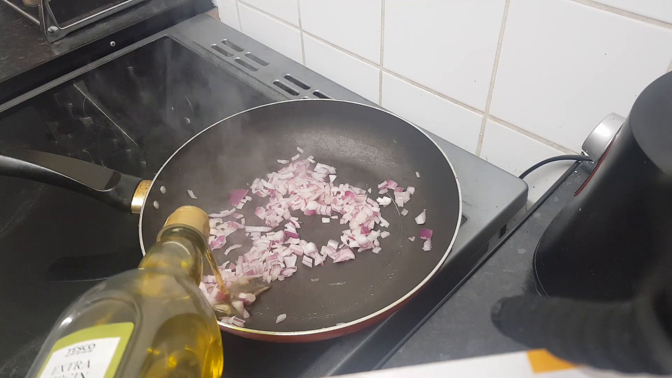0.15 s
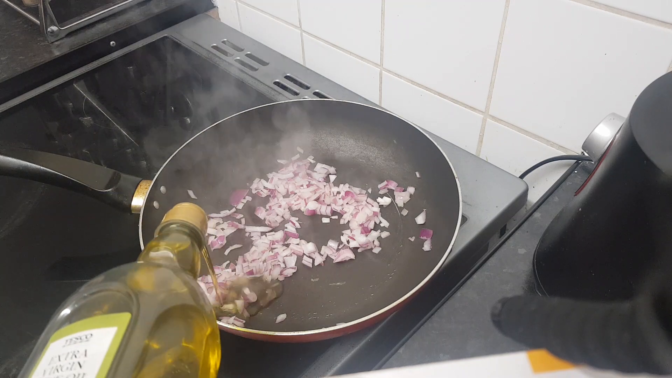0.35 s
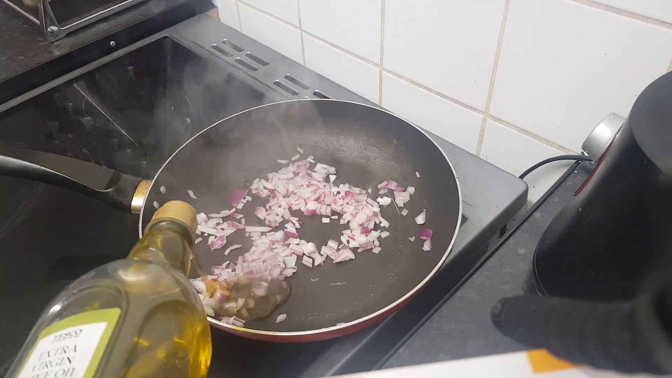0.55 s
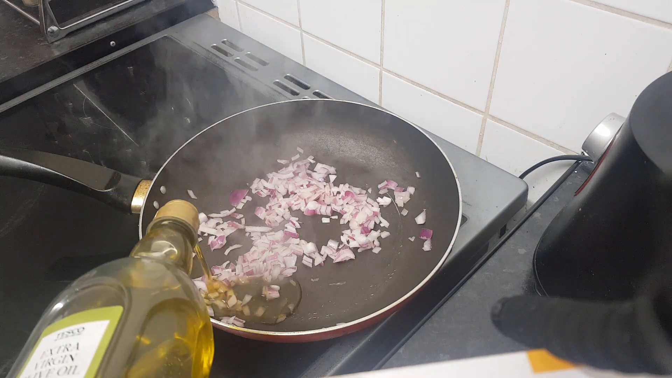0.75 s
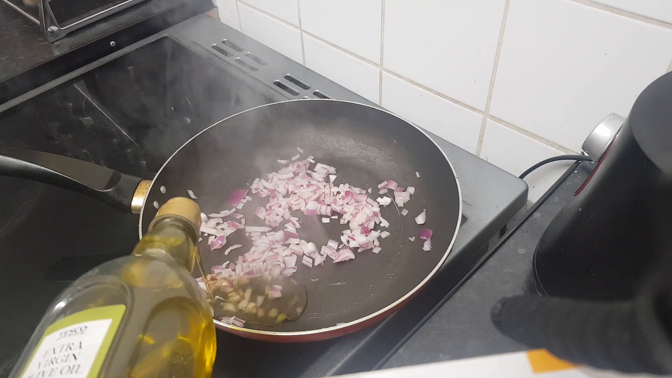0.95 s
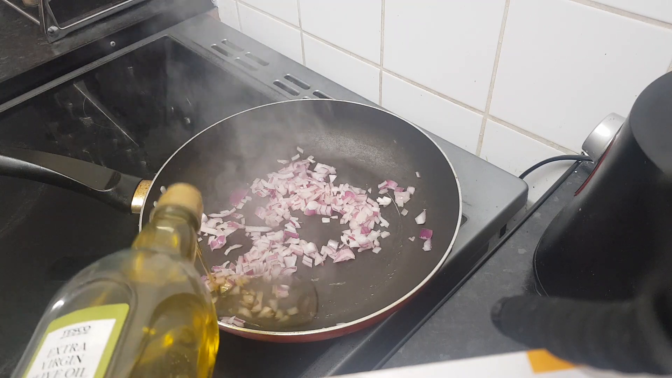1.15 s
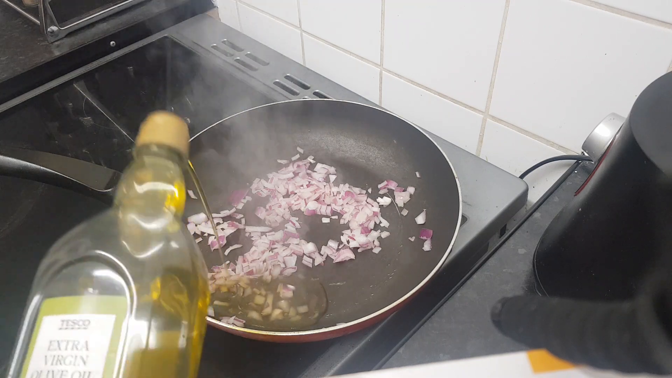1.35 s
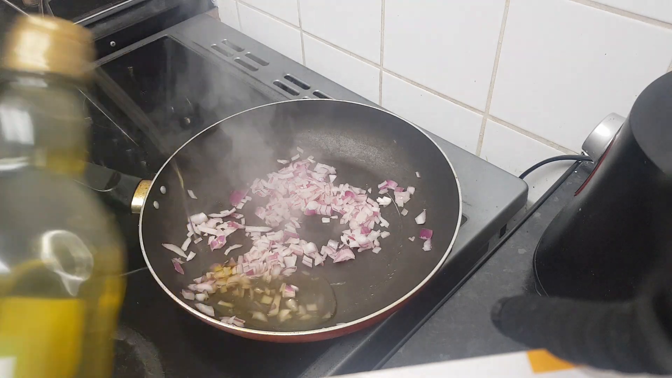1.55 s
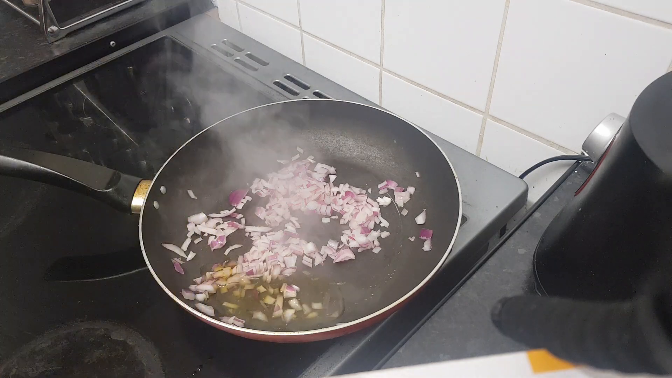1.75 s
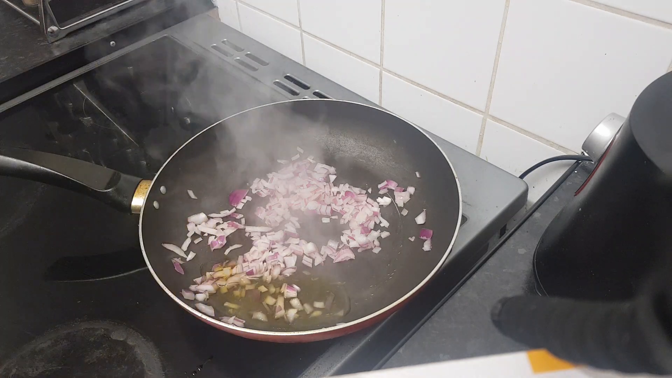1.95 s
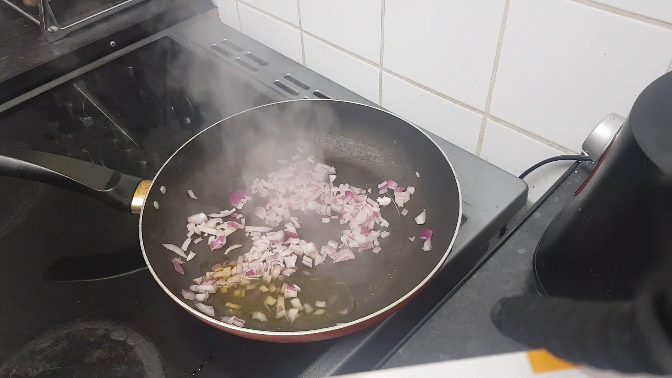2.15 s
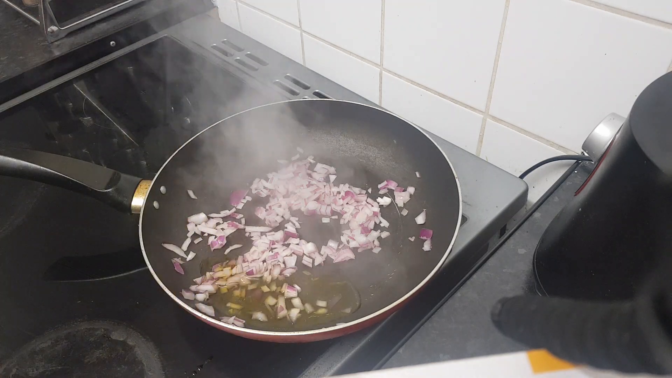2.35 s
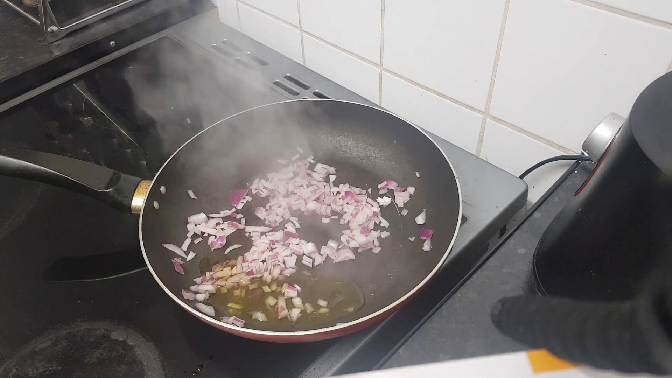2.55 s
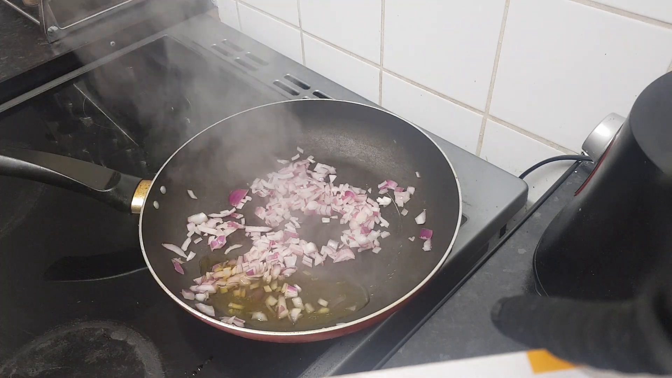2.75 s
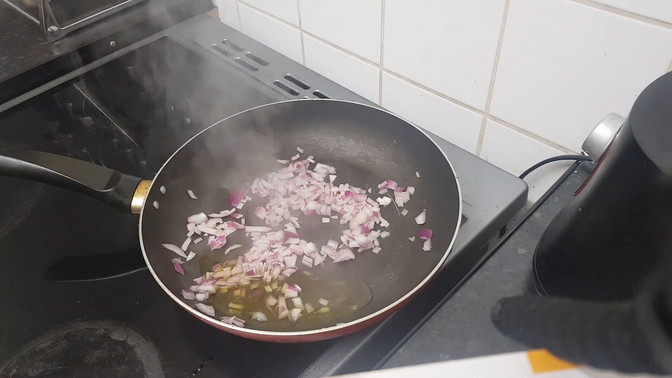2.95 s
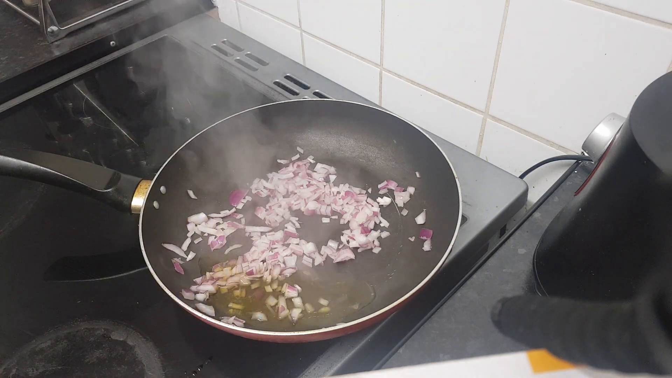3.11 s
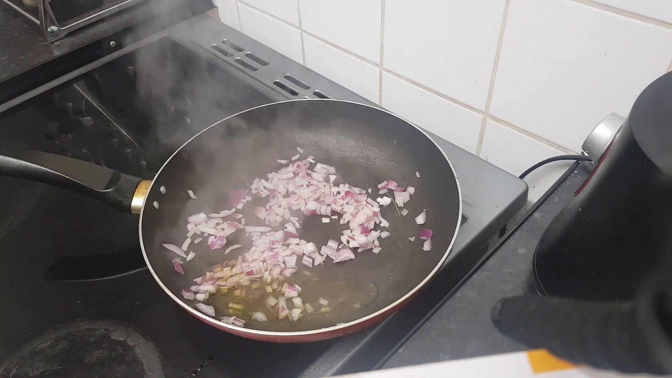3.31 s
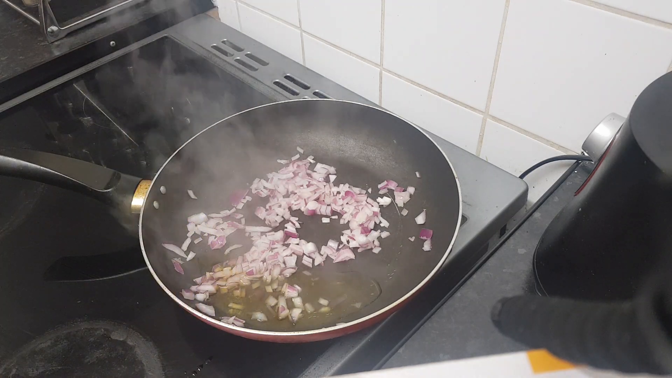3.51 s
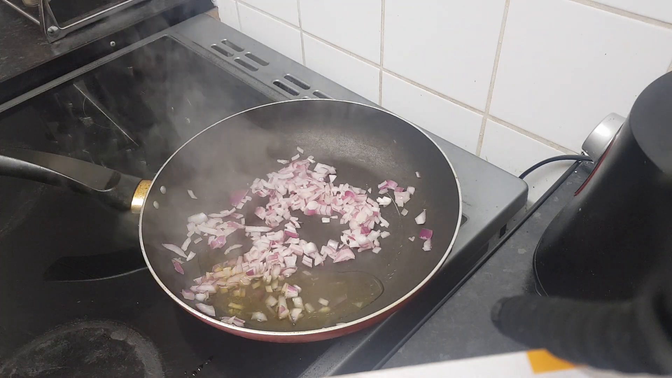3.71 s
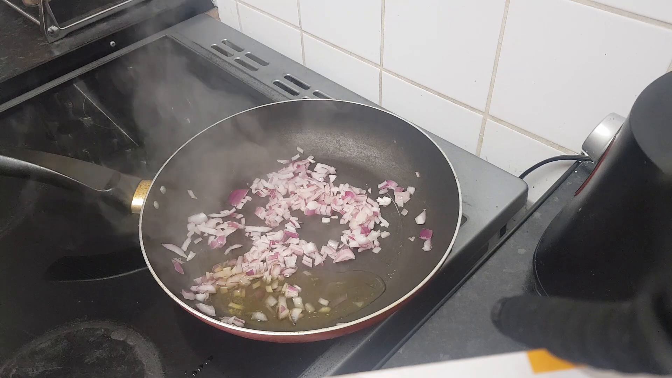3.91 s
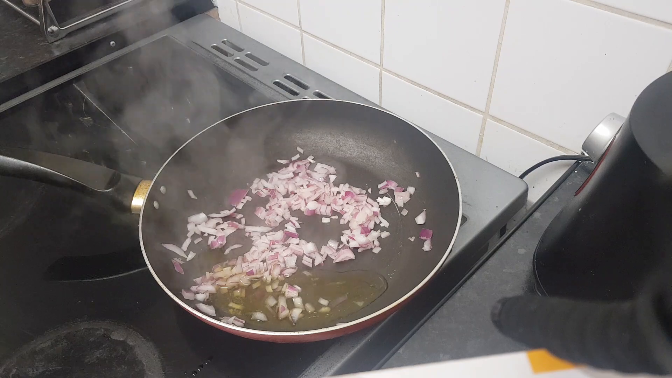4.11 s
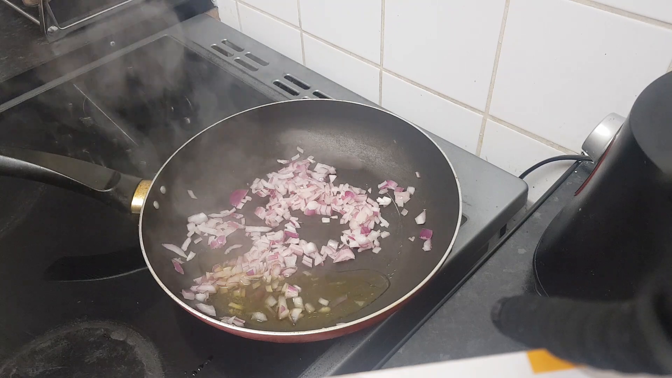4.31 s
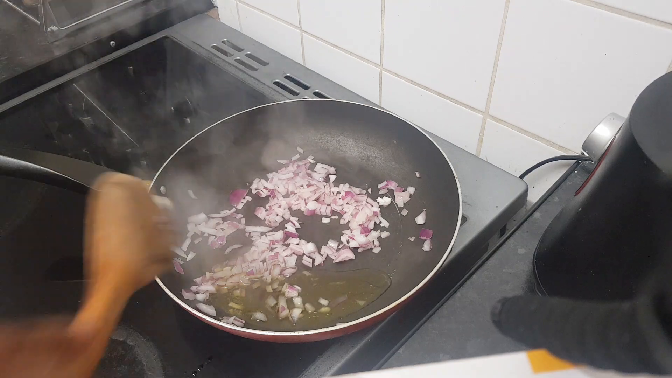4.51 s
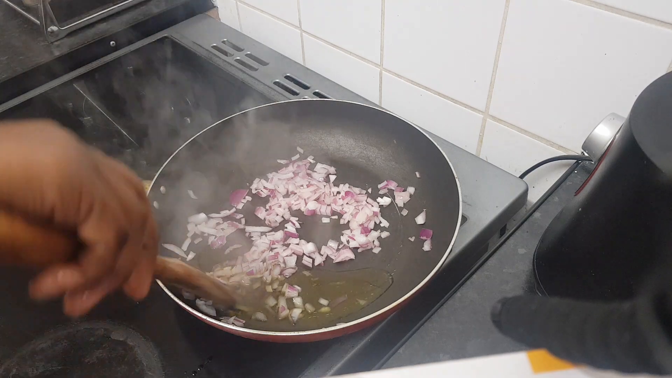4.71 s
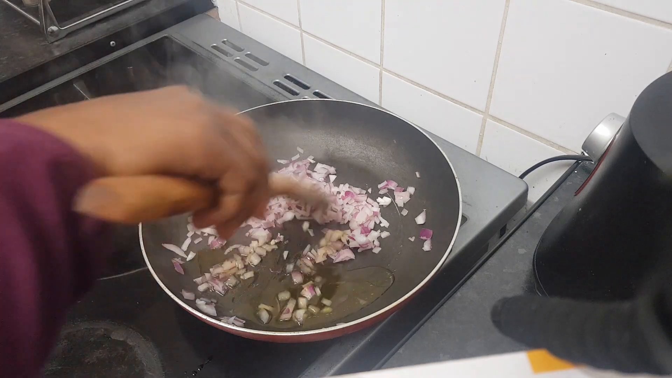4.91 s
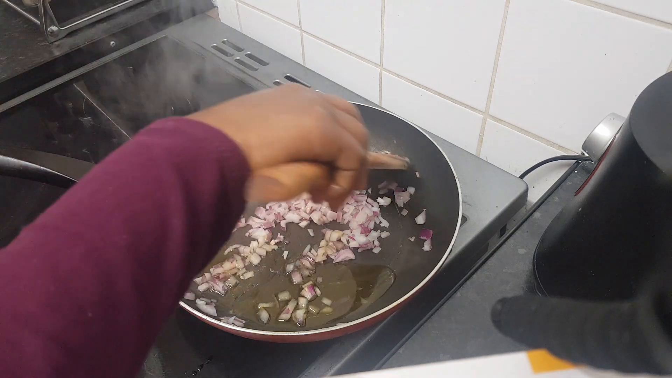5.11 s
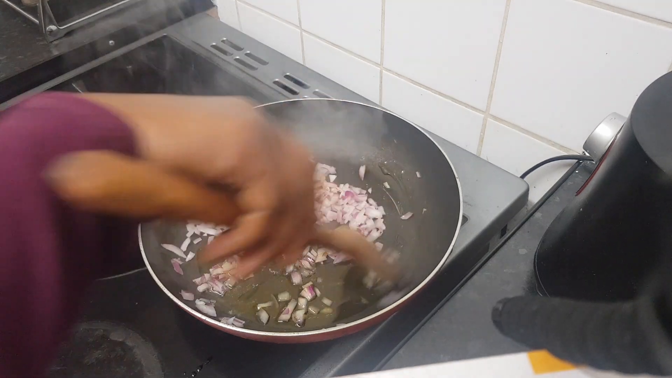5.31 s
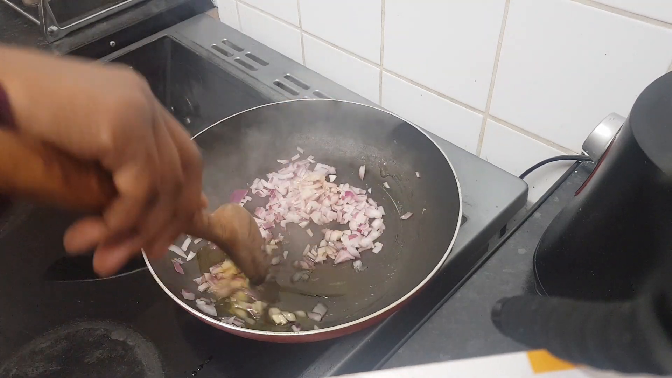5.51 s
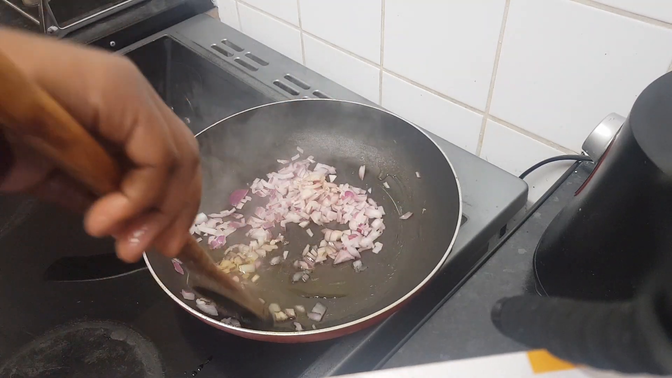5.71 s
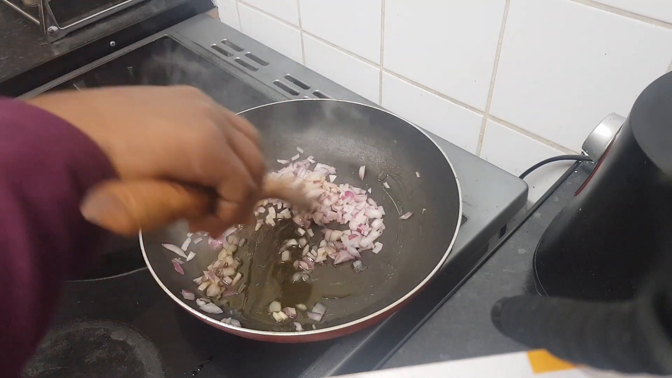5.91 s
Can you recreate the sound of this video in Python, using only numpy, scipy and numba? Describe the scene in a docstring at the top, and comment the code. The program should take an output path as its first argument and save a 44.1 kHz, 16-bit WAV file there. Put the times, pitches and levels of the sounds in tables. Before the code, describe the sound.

Chopped onions sizzle steadily in hot oil; a bottle bumps down, a cupboard door bangs loudly, then a wooden spoon knocks and scrapes the pan.

```python
"""In a tiled kitchen, chopped onions sizzle in oil in a frying pan, heard from a phone held above the hob.
The sizzle is dense random steam clicks through resonances; single drops spit as short snaps with a fizz.
An oil bottle is set down with a few bumps and a cupboard door bangs shut, both as ringing modes of struck bodies;
the bang ducks the phone's gain for a second or so. Then a wooden spoon knocks and scrapes round the pan and the
sizzle swells. A fan, made of narrow bands of noise, hums low throughout."""
import sys
import numpy as np
from scipy import signal
from scipy.fft import rfft, irfft
from scipy.io import wavfile
from scipy.ndimage import uniform_filter1d
from numba import njit

SR = 44100
rng = np.random.default_rng(int(sys.argv[2]) if len(sys.argv) > 2 else 0)


def materialize(psi):
    """Save the field psi as 16-bit PCM at rate SR to the path in sys.argv[1].

    A 1-D psi becomes a single channel; in a 2-D psi each row is a channel.
    """
    bounded = np.clip(np.atleast_2d(psi).T, -1, 1)
    quanta = np.round(bounded * 32767).astype(np.int16)
    wavfile.write(sys.argv[1], SR, quanta)


N = 267246
T = np.arange(N) / SR  # the clock, in seconds

# The fan's hum. Each row: centre in Hz, nominal width in Hz, level in dB.
FAN_BANDS = [(39.8, 12, -65.5), (89.2, 5.1, -65.5), (98, 16, -68), (128, 69, -70.5), (162.4, 8.6, -75),
             (183.8, 22, -74)]

# The bottle set down on the worktop. Each row: time in seconds, peak in dB before the room,
# contact corner in Hz (soft is low).
BOTTLE_BLOWS = [(1.535, -45.5, 900), (1.831, -45.5, 160), (1.983, -35.5, 1100), (2.022, -36.5, 900),
                (2.06, -41.5, 260), (2.164, -33, 547), (2.189, -32, 1120)]
# Modes of bottle and worktop. Each row: pitch in Hz, relative level in dB, t60 in seconds.
BOTTLE_MODES = [(80, -7.5, 0.12), (165, -3.5, 0.12), (206, -11, 0.075), (341.5, -4.5, 0.065),
                (428, -1.5, 0.084), (471, -9, 0.19), (502, -7, 0.43), (579, -6, 0.19), (703, -9, 0.1),
                (826, -7, 0.095), (1067, -5, 0.11)]

# Blows on the cupboard, from the first nudge through the bang to things settling inside.
# Each row: time in seconds, peak in dB before bass loss and room, contact corner in Hz.
CUPBOARD_BLOWS = [(3.223, -36, 400), (3.234, -24.5, 70.3), (3.256, -26.5, 350), (3.264, -23.5, 80),
                  (3.3366, -1.3, 600), (3.3495, -15, 550), (3.573, -35, 150), (3.7, -36.5, 120),
                  (3.835, -32, 1404), (4.069, -40.5, 600)]
# Modes of cupboard door and carcass. Each row: pitch in Hz, relative level in dB, t60 in seconds.
CUPBOARD_MODES = [(77, -25, .55), (101, -19, .3), (138, -18, .15), (194, -2, .18), (234, -3, .15),
                  (309, 2.5, .14), (318, -39, 1.6), (364, -4, .18), (397, -2, .2), (439, -3, .24),
                  (488, -3, .22), (520, -7, .25), (554, -5, .2), (608, 0, .18), (699, -11, .25),
                  (746, -14, .2), (890, -14, .22), (1040, -16, .2)]
# Colour of the door's chatter. Each row: frequency in Hz, gain in dB.
CHATTER_COLOUR = [(150, -16), (240, 4), (460, 14), (660, 13), (850, 3.5), (1500, 1), (2800, -2.5),
                  (4200, -7), (5200, -15), (7000, -33), (16000, -45)]
# The door chatters in its frame as it shuts, each bounce sooner and weaker.
SHUT_S, SHUT_DB = 3.3362, -10.5  # first contact; its noise level before decay and colour
CHATTER_GAP_S, CHATTER_FALL_DB = .012, 3.5  # first gap; loss per bounce
GAP_SHRINK = .72  # each gap as a share of the one before

# Knocks of the spoon, each of which rocks the pan on the hob. Each row: time in seconds,
# peak in dB before the room, contact corner in Hz, time to rock back in seconds, peak of that rock in dB.
PAN_BLOWS = [(4.79, -37.5, 90, .066, -50.5), (5.165, -20, 900, .1, -34), (5.739, -28, 700, .07, -35)]
# Modes of the pan on the hob. Each row: pitch in Hz, relative level in dB, t60 in seconds.
PAN_MODES = [(91.5, 0.5, 0.11), (149, -1, 0.098), (175.2, -0.5, 0.28), (186.6, 2.5, 0.22), (241, -8, 0.18),
             (320, -2.5, 0.21), (384, -6, 0.23), (442, -2, 0.13), (535, 5.5, 0.08), (597, 2, 0.22),
             (723, 3.5, 0.077), (813, 8, 0.15), (957, -17, .16), (1220, -6, 0.087), (1314, -17, .1)]
ROCK_HZ, ROCK_FALL_DB = 211, 7.5  # contact corner of the rocking; loss from one rock to the next
# Strokes of the spoon over the pan. Each row: start in seconds, end in seconds,
# level in dB before pressure and room, centre in Hz.
STROKES = [(4.655, 4.772, -54, 544), (4.77, 4.922, -55.5, 720), (4.773, 4.948, -55.5, 139),
           (5.147, 5.434, -56, 216), (5.19, 5.42, -67, 650), (5.424, 5.556, -55.5, 583),
           (5.742, 5.893, -55, 198), (5.79, 5.917, -53, 700), (5.85, 5.93, -45, 1870)]

# Colour of the frying. Each row: frequency in Hz, gain in dB.
FRY_COLOUR = [(150, -16.5), (330, -17.5), (520, -8), (750, -5.5), (1100, -4), (2200, -4), (4000, -1.5),
              (6500, 0), (10000, -0.5), (16000, -4)]
# The loudest drops of water that spit in the oil. Each row: time in seconds,
# snap peak in dB before trim, colour and room, pitch in Hz.
LOUD_SPITS = [(.925, -24, 4500), (1.462, -24, 6940), (1.525, -24, 11400), (1.902, -24, 2200),
              (2.511, -25, 5550), (2.609, -18.5, 6250), (3.466, -22, 6700), (3.644, -20.5, 6450),
              (5.253, -23, 4170), (5.496, -20, 6840)]
# Smaller drops spit at random, around this level and pitch.
SPITS_PER_S, SMALL_SPIT_DB, SMALL_SPIT_HZ = 3, -31, 5500
# How hard the onions fry: nominal level at rest, and how it builds from below as fresh oil runs in.
FRY_DB, OIL_LACK_DB, OIL_SPREAD_S = -43, 3, 0.15
# Each sweep of the spoon turns wet onion onto hot metal.
# Each row: time in seconds, nominal surge in dB (before its rise and fade, and scaled in each band).
SWEEPS = [(4.5, 0.7), (4.86, 2), (5.4, 1), (5.82, 2)]
SURGE_RISE_S, SURGE_FADE_S = 0.031, 1.74  # time constants

# Decay of the kitchen. Each row: frequency in Hz, t60 in seconds.
KITCHEN_DECAY = [(100, 0.31), (500, 0.31), (4000, 0.26), (16000, 0.042)]
# Resonances of the two microphone ports. Each row: frequency in Hz, left gain in dB, right gain in dB.
PORT_GAINS = [(286, 2.5, 3.5), (737, 3.1, 1.5), (2860, 4.5, 3.5), (5400, 4, 3), (6900, 7.5, 3),
              (7720, -4, 5.5), (8480, 0.5, -6.5), (9830, -3.5, 3.5), (9930, 5, -2.5), (11600, 1.5, 4.5),
              (13840, 2, 2.5), (15800, -18, 6)]
TOP_HZ = 15800  # top edge of the phone's sound


def undb(db):
    """Turn dB into an amplitude factor."""
    return 10 ** (np.asarray(db) / 20)


def unit(x):
    """Scale to rms 1."""
    return x / np.sqrt(np.mean(x ** 2))


def on_log_axis(hz, points):
    """Read (Hz, value) points at any frequency."""
    f, value = np.transpose(points)
    return np.interp(np.log(np.maximum(hz, 1)), np.log(f), value)


def colour(x, points, size=2048):
    """Causal, minimum-phase filter with the given (Hz, dB) response."""
    response = undb(on_log_axis(np.fft.rfftfreq(size, 1 / SR), points))
    cepstrum = irfft(np.log(response))
    # folding the cepstrum forward in time makes the filter causal
    cepstrum[1:size // 2] *= 2
    cepstrum[size // 2 + 1:] = 0
    impulse = irfft(np.exp(rfft(cepstrum)))
    return signal.fftconvolve(x, impulse[None], axes=-1)[:, :x.shape[-1]]


def resonate(x, hz, q):
    """One resonance, gain 1 at its centre."""
    w = 2 * np.pi * min(hz, SR / 2 - 2000) / SR
    a = np.sin(w) / (2 * q)
    return signal.lfilter([a, 0, -a], [1 + a, -2 * np.cos(w), 1 - a], x)


def add(track, s, sound):
    """Mix a short sound into a track at time s."""
    i = int(s * SR)
    track[..., i:i + sound.shape[-1]] += sound[..., :N - i]


def pair(x, lag):
    """A source to one side reaches the left port some samples late (early if negative)."""
    n = np.arange(N)
    return np.array([np.interp(n - lag, n, x), x])


def clicks(rate, spread_db, lag=0, scatter=0):
    """Random clicks per second, many small and few large; scatter gives each its own place."""
    count = int(rate * N / SR)
    at = rng.integers(0, N, count)
    size = undb(spread_db * np.minimum(rng.exponential(size=count), 7.5))
    size = size * rng.choice([-1, 1], count)
    late = np.rint(lag + scatter * rng.standard_normal(count)).astype(int)
    left = np.bincount((at + late) % N, size, N)
    right = np.bincount(at, size, N)
    return np.array([left, right])


def diffuse(x, t60):
    """Echoes of countless scattered sources merge into a hiss that trails their power, unrelated at the ports."""
    keep = np.exp(-2 * np.log(1000) / (t60 * SR))
    power = signal.lfilter([1 - keep], [1, -keep], x ** 2)
    return np.sqrt(power) * rng.standard_normal((2, N))


def kitchen(x, wet_db, first_s=0.0011, alike_hz=520):
    """Direct sound plus dense reflections off the tiles; only the bass is alike at both ports."""
    t = np.arange(SR // 2) / SR
    f = np.fft.rfftfreq(len(t), 1 / SR)
    mid, side = rfft(rng.standard_normal((2, len(t))))
    alike = 1 / (1 + (f / alike_hz) ** 2)
    sides = np.array([[1], [-1]])
    field = mid * np.sqrt((1 + alike) / 2) + sides * side * np.sqrt((1 - alike) / 2)
    centres = np.array(KITCHEN_DECAY)[:, 0]
    echo = 0
    for (hz, t60), share in zip(KITCHEN_DECAY, np.eye(len(KITCHEN_DECAY))):
        band = on_log_axis(f, np.c_[centres, share])  # bands cross-fade and sum to 1
        echo = echo + irfft(field * band, len(t)) * np.exp(-np.log(1000) * t / t60)
    echo = unit(echo * (t > first_s)) / np.sqrt(len(t))  # unit energy
    return x + undb(wet_db) * signal.fftconvolve(x[1:], echo, axes=-1)[:, :N]


def struck(blows, modes, lag, vary_db, apart_hz=520):
    """Each blow rings the modes of a body in its own mix; a soft contact leaves out the high ones."""
    out, t = np.zeros((2, N)), np.arange(SR) / SR
    hz, db, t60 = np.transpose(modes)[:, :, None]
    # the shorter its wave, the more a mode differs in phase between the ports once the near walls answer
    twist = rng.choice([-1, 1], hz.shape) * np.minimum(hz / apart_hz, 1) / 2
    twist = twist * (1 - np.exp(-t / 0.0057))
    decay = undb(db) * np.exp(-np.log(1000) * t / t60)
    rings = np.array([decay * np.cos(2 * np.pi * hz * t + side * twist) for side in (1, -1)])
    for s, peak_db, corner_hz in blows:
        mix = undb(vary_db * rng.standard_normal(len(modes)))
        soften = signal.butter(2, corner_hz, fs=SR, output="sos")
        ring = signal.sosfilt(soften, mix @ rings)
        ring = -undb(peak_db) * ring / abs(ring).max()
        add(out[0], s + lag / SR, ring[0])
        add(out[1], s, ring[1])
    return out


def bounces(s, db, gap_s, fall_db, count):
    """Contacts of something that settles, as (s, dB): gaps shrink and blows weaken."""
    k = np.arange(count)
    delays = gap_s * np.r_[0, np.cumsum(GAP_SHRINK ** k[:-1])]
    return zip(s + delays, db - fall_db * k)


def fan(side_db=-18):
    """A low wavering hum: narrow bands of noise, nearly the same at both ports."""
    hum = np.zeros((2, N))
    for hz, width, db in FAN_BANDS:
        q = hz / width / 2
        noise = rng.standard_normal((2, N))
        hum += undb(db) * unit(resonate(resonate(noise, hz, q), hz, q))
    mid, side = hum
    return mid + undb(side_db) * np.array([side, -side])


def bottle(wet_db=-11):
    """The oil bottle bumps and settles on the worktop, ringing the modes of both."""
    return kitchen(struck(BOTTLE_BLOWS, BOTTLE_MODES, lag=4.3, vary_db=4), wet_db)


def cupboard(wet_db=-19, chatter_s=0.0021, chatter_wet_db=4.5, chatter_t60=0.32, radiate_hz=40):
    """Dull bumps and the bang of the door, whose edge chatters in the frame as bursts of noise."""
    chatter, t = np.zeros(N), np.arange(SR // 20) / SR
    for s, db in bounces(SHUT_S, SHUT_DB, CHATTER_GAP_S, CHATTER_FALL_DB, count=5):
        add(chatter, s, undb(db) * rng.standard_normal(len(t)) * np.exp(-t / chatter_s))
    body = struck(CUPBOARD_BLOWS, CUPBOARD_MODES, lag=16.0, vary_db=1.4)
    # the small panel radiates little deep bass
    body = signal.sosfilt(signal.butter(1, radiate_hz, "high", fs=SR, output="sos"), body)
    crack = pair(chatter, 11.6) + undb(chatter_wet_db) * diffuse(chatter, chatter_t60)
    return kitchen(body, wet_db) + colour(crack, CHATTER_COLOUR)


def spoon(slips_per_s=1500, spread_db=2.5, q=0.61, wet_db=-13):
    """Wood knocks on the pan, and sticks and slips as it pushes the onions round."""
    knocks = [row[:3] for row in PAN_BLOWS]
    rocks = []
    for s, _, _, back_s, rock_db in PAN_BLOWS:
        contacts = bounces(s + back_s, rock_db, back_s * GAP_SHRINK, ROCK_FALL_DB, count=2)
        rocks += [(at, db, ROCK_HZ) for at, db in contacts]
    out = struck(knocks + rocks, PAN_MODES, lag=-2.2, vary_db=3.5)
    for start, end, db, hz in STROKES:
        # a rounded swell, 1 at mid-stroke
        pressure = np.sqrt(np.maximum(0, (T - start) * (end - T))) * 2 / (end - start)
        slips = clicks(slips_per_s, spread_db, lag=-2)
        rub = resonate(resonate(slips, hz, q), hz, q / 2)
        out = out + undb(db) * pressure * unit(rub)
    return kitchen(out, wet_db)


def spits(cycles=.6, fizz_db=-20.5, fizz_s=.012, wet_db=-4, gain_db=-1.5, vary_db=2):
    """A drop flashes to steam: one sharp snap and a brief fizz."""
    out, t = np.zeros(N), np.arange(SR // 20) / SR
    small = []
    for when, size, pitch in rng.random((int(SPITS_PER_S * N / SR), 3)):
        db = SMALL_SPIT_DB + vary_db * (2 * size - 1)
        hz = SMALL_SPIT_HZ * 2 ** (2 * pitch - 1)  # up to an octave either way
        small.append((when * T[-2], db, hz))
    for s, db, hz in [*LOUD_SPITS, *small]:
        snap = resonate(np.exp(-t * hz / cycles), hz, 0.93)
        hiss = unit(resonate(rng.standard_normal(len(t)), hz, 1))
        fizz = undb(fizz_db) * hiss * np.exp(-t / fizz_s)
        add(out, s, undb(db + gain_db) * (snap / abs(snap).max() + fizz))
    return kitchen(colour(pair(out, -1), FRY_COLOUR), wet_db)


def frying_db():
    """The frying builds as the oil spreads, then surges and slowly eases after each sweep of the spoon."""
    db = FRY_DB - OIL_LACK_DB * np.exp(-T / OIL_SPREAD_S)
    for s, surge_db in SWEEPS:
        age = np.maximum(T - s, 0)
        db = db + surge_db * (1 - np.exp(-age / SURGE_RISE_S)) * np.exp(-age / SURGE_FADE_S)
    return db


def sizzle(spread_db=2.5, q=0.78, coarsen=0.022, wet_db=-3, t60=0.083, gain_db=2.18):
    """Steam bubbles of all sizes burst as clicks of a cycle or two; hard frying favours the large ones."""
    swell_db = frying_db() - FRY_DB
    bursts, steady = 0, 0
    for hz in np.geomspace(500, 15000, 8):
        rate = 18 * np.sqrt(hz)  # small bubbles are the more numerous
        pops = clicks(rate, spread_db, lag=-2.5, scatter=2.4)
        cloud = pops + undb(wet_db) * diffuse(pops[1], t60)
        band = unit(resonate(cloud, hz, q)) * np.sqrt(hz)
        steady = steady + band
        swell_share = 1.5 - coarsen * np.log2(hz / 4000)  # low bands swell more
        bursts = bursts + band * undb(swell_db * swell_share)
    # level is set against the mix without its swells
    return colour(bursts, FRY_COLOUR) / np.std(steady) * undb(FRY_DB + gain_db)


def scene():
    """The whole kitchen, from the background to the frying."""
    return fan() + bottle() + cupboard() + spoon() + spits() + sizzle()


@njit
def follow(x, attack, release):
    """Follow a level, with one speed up and another down."""
    out, e = np.empty(len(x)), 0.
    for i in range(len(x)):
        e += (x[i] - e) * (attack if x[i] > e else release)
        out[i] = e
    return out


def gain_control(x, threshold_db=-21, depth_db=8.5, hold_s=0.99, attack_s=0.36, release_s=0.24):
    """A loud sound makes the gain glide down, stay there for a while and come back."""
    power = uniform_filter1d(np.mean(x ** 2, axis=0), SR // 100)
    level_db = 10 * np.log10(np.abs(power) + 1e-12)
    last_loud = np.maximum.accumulate(np.where(level_db > threshold_db, T, -np.inf))
    cut_db = depth_db * (T - last_loud < hold_s)
    return x * undb(-follow(cut_db * 1., 1 / (attack_s * SR), 1 / (release_s * SR)))


def record(dry, low_cut_hz=55):
    """The phone: bass roll-off, port resonances, gain control, clipping and a steep top edge."""
    ports = np.array(PORT_GAINS)
    dry = signal.sosfilt(signal.butter(2, low_cut_hz, "high", fs=SR, output="sos"), dry)
    heard = np.vstack([colour(dry[[k]], ports[:, [0, k + 1]]) for k in range(2)])
    heard = np.clip(gain_control(heard), -1, 1)
    return signal.sosfilt(signal.ellip(12, .1, 80, TOP_HZ, fs=SR, output="sos"), heard)


dry = scene()
out = record(dry)
materialize(out)
```